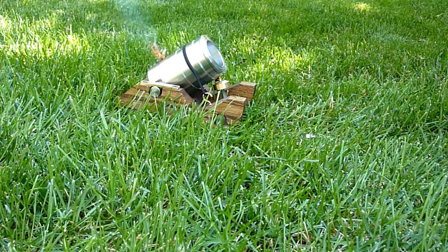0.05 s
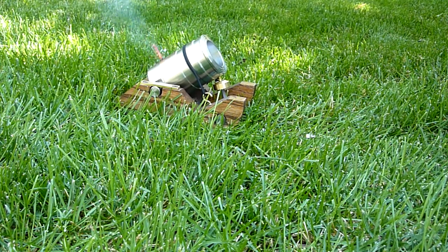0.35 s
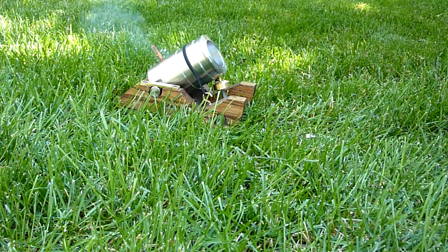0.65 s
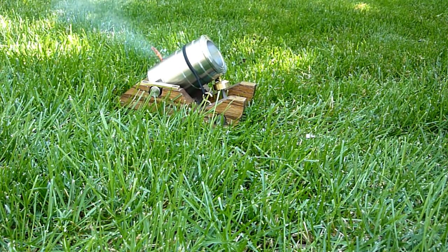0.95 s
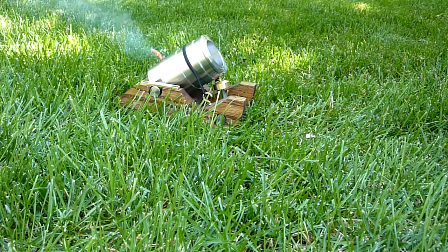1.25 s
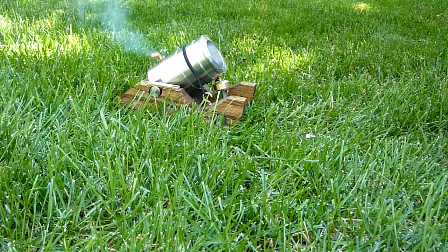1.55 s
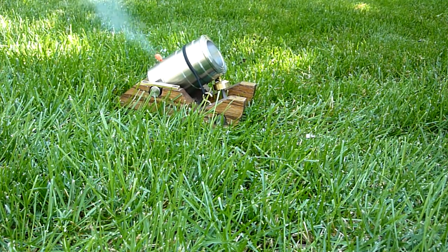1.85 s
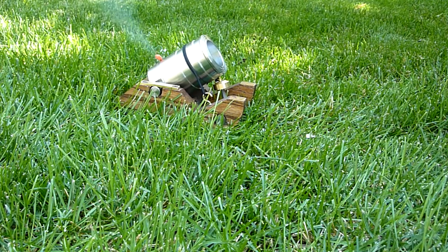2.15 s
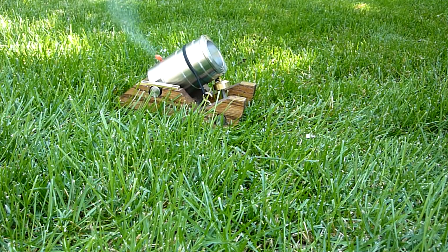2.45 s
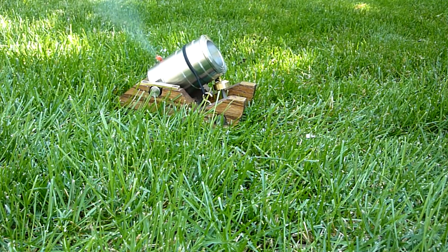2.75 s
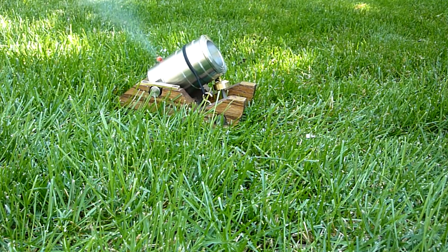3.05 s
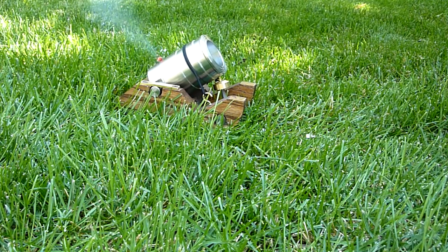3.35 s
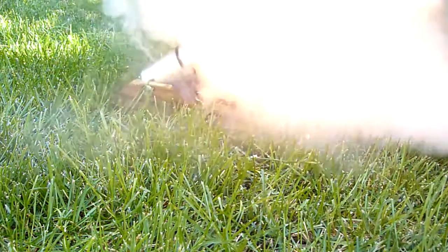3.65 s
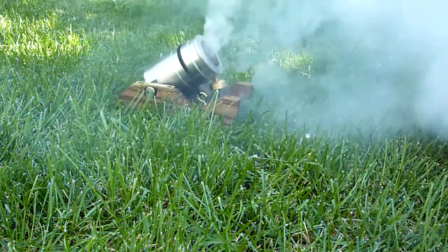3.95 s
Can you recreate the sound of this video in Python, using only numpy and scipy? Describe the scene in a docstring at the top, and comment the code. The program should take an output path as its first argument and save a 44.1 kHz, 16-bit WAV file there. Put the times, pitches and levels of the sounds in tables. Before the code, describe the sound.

One loud black powder mortar shot follows a quietly sputtering fuse and rumbles away outdoors.

```python
"""Black powder mortar on a lawn

Close to the microphone, a small mortar's fuse hisses and sputters over faint open air.
The charge fires with a crack that overloads the microphone. Nearby surfaces slap it back,
a rumble rolls away among trees and houses, and one distant echo returns.
The last gas hisses out after the shot."""
import sys
import numpy as np
from scipy import signal
from scipy.fft import rfft, irfft
from scipy.io import wavfile

SR = 44100
rng = np.random.default_rng(int(sys.argv[2]) if len(sys.argv) > 2 else 0)


def transcribe(u):
    """Save the signal u as a 16-bit wav file named by the first command-line argument.

    u: samples, shape (n,) or (channels, n), limited to [-1, 1]; the rate is SR.
    q: integer samples, one column per channel.
    """
    v = np.clip(np.atleast_2d(u).T, -1, 1)
    q = np.round(v * 32767).astype(np.int16)
    wavfile.write(sys.argv[1], SR, q)


N = 176400
T = np.arange(N) / SR
HZ = np.fft.rfftfreq(N, 1 / SR)
FIRE_S = 3.4739

# left-right likeness of the close fuse and crack: f/Hz, likeness (1 = mono)
CLOSE_LIKENESS = [(1000, 0.63), (3000, 1), (15000, 0.8)]
# left-right likeness of the roar, rumble and echoes: f/Hz, likeness
TAIL_LIKENESS = [(60, 1), (300, 1), (640, .985), (1400, 0.93), (3100, 0.52), (6800, 0.15), (15000, .2)]


def amp(db):
    """Decibels to gain."""
    return 10 ** (np.asarray(db) / 20)


def unit(x):
    """Scales to rms 1."""
    return x / np.sqrt(np.mean(x ** 2) + 1e-20)


def pan(db):
    """Stereo gains, the left louder than the right by db."""
    return amp([[db / 2], [-db / 2]])


def over_hz(points):
    """Spreads a table over the spectrum on a log-frequency axis."""
    hz, value = np.transpose(points)
    return np.interp(np.log(HZ + 1), np.log(hz + 1), value)


def level(points):
    """Gain over time from rows of t/s, level/dB."""
    return amp(np.interp(T, *np.transpose(points)))


def noise(colour_db, likeness):
    """Stereo noise of rms 1 with a given spectral shape and left-right likeness."""
    mid, side = rfft(rng.standard_normal((2, N)))
    same = np.clip(over_hz(likeness), 0, 1)
    mid, side = mid * np.sqrt(1 + same), side * np.sqrt(1 - same)
    return unit(irfft(np.array([mid + side, mid - side]) * amp(colour_db), N))


def narrow_noise(centre_hz, width_hz):
    """A narrow band of noise that follows a moving centre frequency."""
    spread = irfft(rfft(rng.standard_normal((2, N))) * np.exp(-(HZ / width_hz) ** 2), N)
    phase = 2 * np.pi * np.cumsum(centre_hz) / SR
    return unit(spread[0] * np.cos(phase) + spread[1] * np.sin(phase))


def waver(rate_hz, depth_db):
    """A factor that wanders at random around 1."""
    slow_band = np.exp(-(HZ / rate_hz) ** 2) * (HZ > 2)
    drift = irfft(rfft(rng.standard_normal(N)) * slow_band, N)
    return amp(depth_db * unit(drift))


def burst(start, rise_s, hold_s, t60_s):
    """Linear attack, then an exponential fall from hold_s after the start."""
    age = T - start
    return np.clip(age / rise_s, 0, 1) * np.exp(-np.log(1000) * np.maximum(age - hold_s, 0) / t60_s)


def die_away(x, decay, rise_s, hold_s):
    """Starts a noise at the shot and lets each band die at its own speed."""
    spectrum, bands = rfft(x), 0
    centres_hz, t60s = np.transpose(decay)
    for t60, pick in zip(t60s, np.eye(len(decay))):
        weight = over_hz(list(zip(centres_hz, pick)))
        bands = bands + irfft(spectrum * weight, N) * burst(FIRE_S, rise_s, hold_s, t60)
    return bands


def far_tone(start, end, hz, db, pitch_waver_db):
    """A distant wavering tone that drifts in and out."""
    progress = np.clip((T - start) / (end - start), 0, 1)
    swell = np.sqrt(np.maximum(np.sin(np.pi * progress), 0))
    pitch = hz * waver(rate_hz=12.5, depth_db=pitch_waver_db)
    tone = unit(np.sin(2 * np.pi * np.cumsum(pitch) / SR))
    return amp(db) * swell * tone * waver(rate_hz=7.9, depth_db=3.5)


def outdoors():
    """Steady low wash of open air around the lawn, with faint drones and whistles far off."""
    # spectrum of the open air: f/Hz, relative level/dB
    air_colour = [(20, -9), (50, -10), (80, -5), (112, -4), (140, -4), (200, -3.5), (350, -4.5),
                  (500, -7.5), (1050, -11.5), (1500, -17), (2000, -21.5), (6000, -27), (15500, -32)]
    # its left-right likeness: f/Hz, likeness
    air_likeness = [(60, 0.96), (300, .98), (640, .94), (1400, 0.72), (4000, 0.22), (15000, 0.52)]
    # low drones: start t/s, end t/s, f/Hz, level/dB
    drone_notes = [(-.3, 2.07, 113.7, -60.5), (1.85, 3.45, 200.2, -60.5)]
    # two whistles, likely a bird: start t/s, end t/s, f/Hz, level/dB
    whistle_notes = [(.22, .33, 1670, -64.5), (.43, 0.548, 1670, -63)]
    air = amp(-51) * noise(over_hz(air_colour), air_likeness) * waver(rate_hz=11, depth_db=0.67)
    drones = sum(far_tone(*note, pitch_waver_db=0.03) for note in drone_notes)
    whistles = sum(far_tone(*note, pitch_waver_db=0.5) for note in whistle_notes)
    return air + drones + whistles


def fuse():
    """The fuse burns close by with a fine jet and a coarse, spitting sputter until the shot."""
    # spectra of jet and sputter: f/Hz, relative level/dB
    jet_colour = [(500, -43), (2200, -11), (4500, -8.5), (7000, 0.5), (9500, -0.5), (11000, -2), (13000, 1),
                  (15500, -8.5)]
    sputter_colour = [(600, -8), (1600, -16.5), (2050, -12), (2900, -1.5), (3700, 0), (4700, -2.5),
                      (6200, -10), (10000, -15.5), (15500, -21)]
    # their strength as the fuse burns: t/s, level/dB
    jet_level = [(0, -56), (.18, -57.5), (.42, -54.5), (.68, -55.5), (.97, -53.5), (1.3, -54), (1.65, -54),
                 (2.1, -58.5), (2.55, -60.5), (3.1, -60.5), (3.45, -56.5)]
    sputter_level = [(0, -58), (.33, -62.5), (.48, -55.5), (.62, -60), (.8, -55), (1.13, -59.5),
                     (1.27, -61), (1.57, -59), (1.74, -56.5), (1.87, -52), (2.0, -54), (2.12, -51.5),
                     (2.23, -57), (2.47, -57), (2.67, -55), (2.88, -58.5), (3.16, -52), (3.38, -58),
                     (3.46, -49)]
    # short spits: t/s, level/dB
    spit_events = [(.243, -56), (.49, -56), (.855, -54), (.96, -54), (1.145, -56), (1.642, -52),
                   (2.296, -50), (3.285, -51)]
    jet = noise(over_hz(jet_colour), CLOSE_LIKENESS) * level(jet_level)
    jet *= waver(rate_hz=15, depth_db=0.5)
    spits = sum(amp(db) * burst(t, rise_s=0.004, hold_s=0.016, t60_s=0.08) for t, db in spit_events)
    sputter = noise(over_hz(sputter_colour), CLOSE_LIKENESS) * np.hypot(level(sputter_level), spits)
    sputter *= waver(rate_hz=32, depth_db=1.24)
    return (jet + sputter) * waver(rate_hz=270, depth_db=1.03) * (T < FIRE_S)


def vent():
    """Gas escapes after the shot: a thin, swelling hiss with a narrow core that sinks in pitch."""
    # spectrum of the hiss: f/Hz, relative level/dB
    hiss_colour = [(1500, -9), (3500, 0.5), (6000, -3), (9000, -0.5), (11500, 0), (14000, -1), (15500, -13)]
    # its swells: t/s, level/dB
    hiss_level = [(3.66, -70), (3.73, -53), (3.78, -48.5), (3.83, -49), (3.86, -44), (3.925, -44.5),
                  (3.95, -53), (4, -51)]
    # its left-right likeness: f/Hz, likeness
    hiss_likeness = [(3000, 0.45), (15000, 0.48)]
    # path of the core: t/s, centre f/Hz, level/dB
    core_path = [(3.83, 13600, -64), (3.86, 12200, -48), (3.9, 11500, -52), (3.932, 11600, -48.5),
                 (3.954, 11500, -77)]
    hiss = noise(over_hz(hiss_colour), hiss_likeness) * level(hiss_level)
    hiss *= waver(rate_hz=150, depth_db=1.2)
    times, centre_hz, core_db = np.transpose(core_path)
    core = narrow_noise(np.interp(T, times, centre_hz), width_hz=1800)
    core *= amp(np.interp(T, times, core_db))
    return hiss * (T > FIRE_S) + core * (T > times[0])


def rumble():
    """Trees and houses all around return the shot as a lumpy rumble that grows duller."""
    # spectrum of the returns: f/Hz, relative level/dB
    colour = [(20, -32), (50, -19), (95, 0.5), (170, -3), (330, -2), (480, -7.5), (1000, -10.5),
              (2500, -17.5), (4000, -25), (7000, -31.5), (15500, -34.5)]
    # decay by band: f/Hz, t60/s
    decay = [(100, 3.1), (300, 2.32), (1000, 2.5), (2500, 2.3), (6000, 1.53), (15000, 0.95)]
    returns = noise(over_hz(colour), TAIL_LIKENESS) * waver(rate_hz=114, depth_db=1)
    return amp(-29) * die_away(returns, decay, rise_s=0.047, hold_s=0.047)


def echoes():
    """Four nearby surfaces and a distant one each send the bang back as a dull, smeared slap."""
    # arrivals at the microphone: t/s, level/dB, treble edge f/Hz, t60/s
    arrivals = [(3.502, -22.5, 9000, 0.029), (3.51, -15.5, 3000, 0.012), (3.5424, -24.5, 890, 0.053),
                (3.621, -32, 1200, 0.032), (3.8262, -28, 2800, 0.038)]
    bass_edge_hz = 348
    bass_loss = 1 + (bass_edge_hz / (HZ + 1)) ** 2
    slaps = 0
    for start, db, edge_hz, t60 in arrivals:
        treble_loss = (1 + (HZ / edge_hz) ** 6) * (1 + (2 * HZ / edge_hz) ** 2)
        dulled = noise(-10 * np.log10(bass_loss * treble_loss), TAIL_LIKENESS)
        slaps = slaps + amp(db) * dulled * burst(start, rise_s=0.00077, hold_s=0.00076, t60_s=t60)
    return slaps


def roar():
    """The flame's roar and the scatter from nearby surfaces hold a moment, then fall quickly."""
    # spectrum of flame and scatter: f/Hz, relative level/dB
    colour = [(20, -11), (45, -12), (90, -1.5), (180, -0.5), (300, -1), (500, -2.5), (780, -4),
              (1300, -13.5), (2800, -19.5), (4800, -22), (8500, -26), (15500, -35)]
    # decay by band: f/Hz, t60/s
    decay = [(100, 0.14), (400, 0.22), (1000, 0.072), (3000, 0.16), (6000, 0.21), (15000, .21)]
    flame = noise(over_hz(colour), TAIL_LIKENESS)
    return amp(-15) * die_away(flame, decay, rise_s=0.004, hold_s=0.033)


def pressure_pulse(length_s, db):
    """A jump in pressure that falls through zero into suction after length_s."""
    progress = np.maximum(T - FIRE_S, 0) / length_s
    return amp(db) * (1 - progress) * np.exp(-progress) * (T > FIRE_S)


def blast():
    """The muzzle at close range: a shock, the shove of expanding gas, a crack and a short ring."""
    # spectrum of the turbulent crack: f/Hz, relative level/dB
    crack_colour = [(100, -11), (600, 8.5), (1600, -10), (3000, 9), (4200, -7), (7000, -2), (9500, -3),
                    (12500, 3.5), (15500, 1)]
    # ringing of barrel, base and the camera that holds the microphone: f/Hz, level/dB, t60/s
    ring_modes = [(203.8, -16.5, .25), (346, -14, 0.08), (398, 0.5, .03), (487, -12, 0.094),
                  (542, -16.5, 0.15), (738, -15, 0.087)]
    shock = pressure_pulse(length_s=0.00066, db=8)
    shove = pressure_pulse(length_s=0.0039, db=-11)
    crack = amp(4) * noise(over_hz(crack_colour), CLOSE_LIKENESS)
    crack *= burst(FIRE_S, rise_s=0.00018, hold_s=0.0023, t60_s=0.013)
    ring_age = np.maximum(T - FIRE_S - 0.002285, 0)  # starts just behind the shock
    ring = sum(amp(db) * np.sin(2 * np.pi * hz * ring_age) * np.exp(-np.log(1000) * ring_age / t60)
               for hz, db, t60 in ring_modes)
    return shock + shove + crack - ring


def scene():
    """From the microphone: the blast dead centre, the fuse a little left, the rest a little right."""
    tail = (roar() + rumble() + echoes()) * pan(-0.65)
    return outdoors() * pan(-0.9) + fuse() * pan(1.9) + blast() + tail + vent() * pan(-1.5)


def record(dry):
    """The camera's microphone has a narrow treble notch, clips on the bang and limits the band."""
    notch_hz, notch_width_hz, clip_level, top_hz = 7910, 340, 0.93, 15750
    notched = signal.lfilter(*signal.iirnotch(notch_hz, notch_hz / notch_width_hz, SR), dry)
    clipped = np.clip(notched, -clip_level, clip_level)
    low_pass = signal.firwin(511, top_hz, window=("kaiser", 9), fs=SR)
    return signal.oaconvolve(clipped, low_pass[None], "same")


dry = scene()
out = record(dry)
transcribe(out)
```